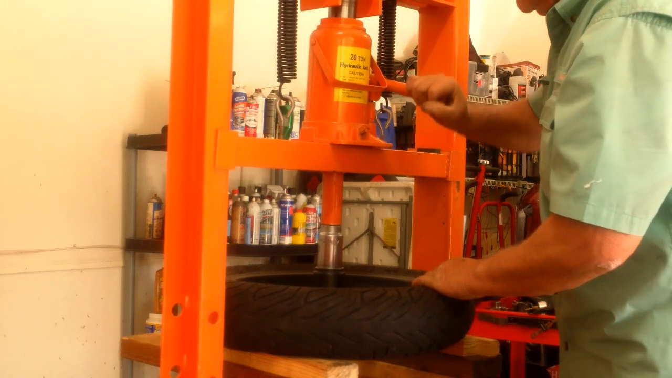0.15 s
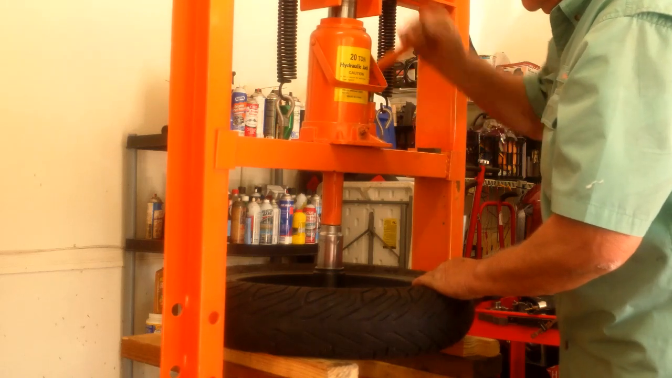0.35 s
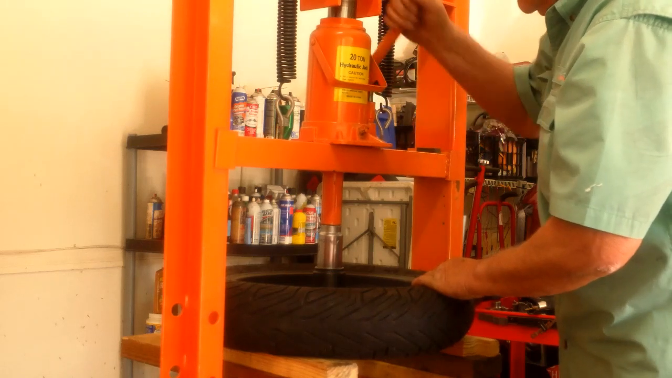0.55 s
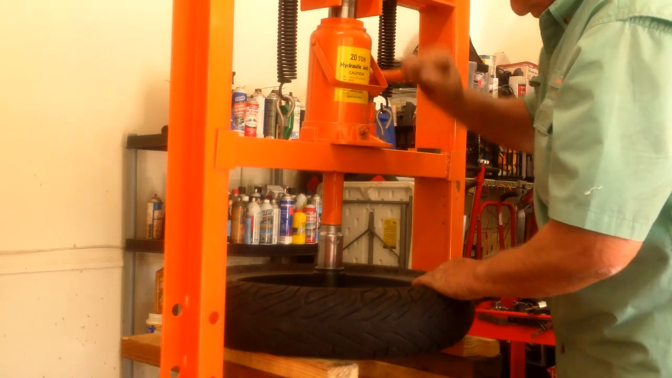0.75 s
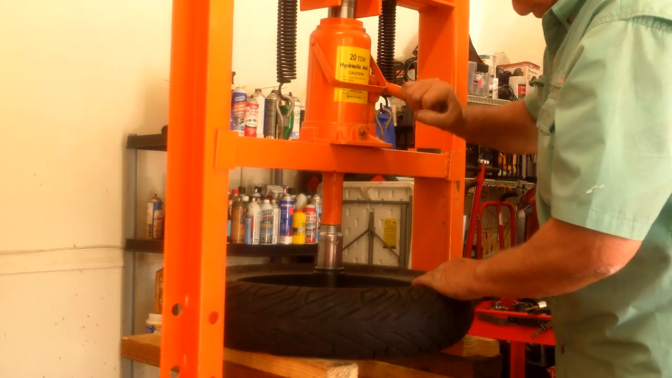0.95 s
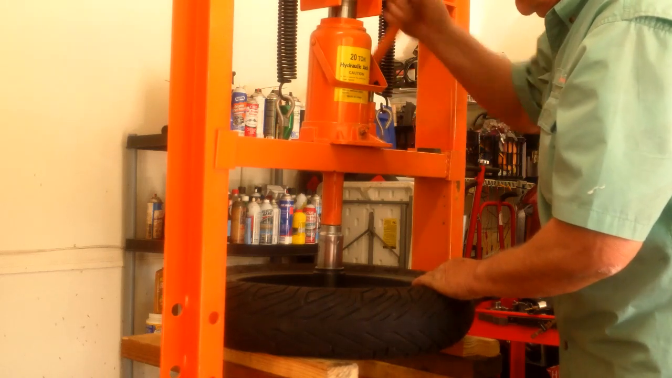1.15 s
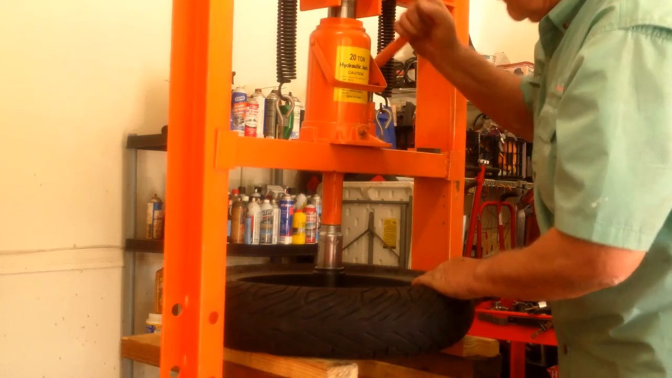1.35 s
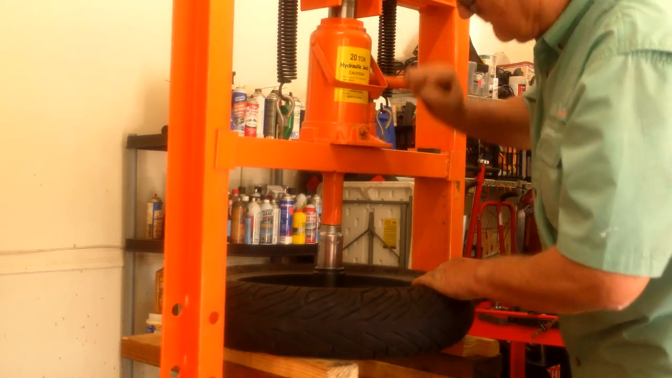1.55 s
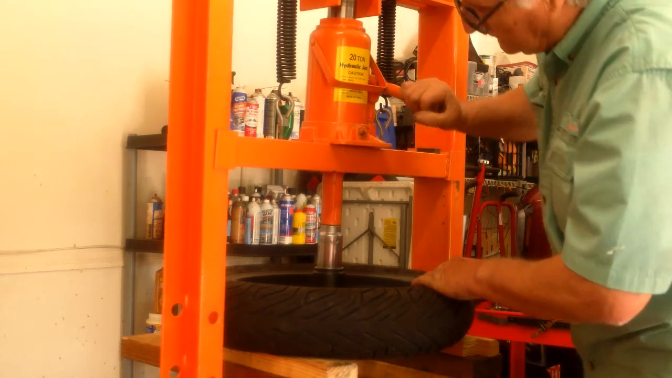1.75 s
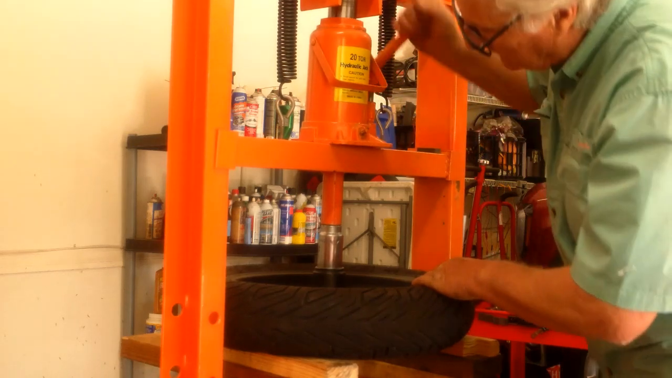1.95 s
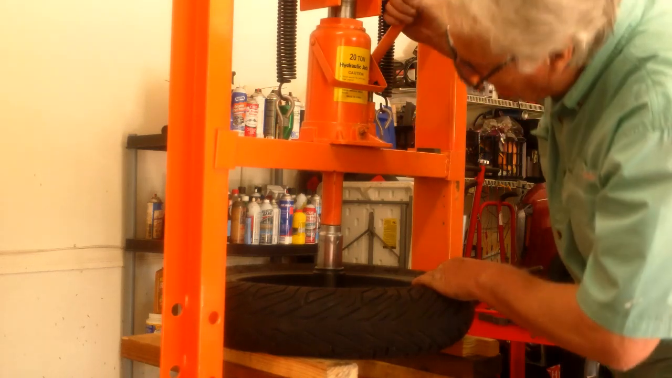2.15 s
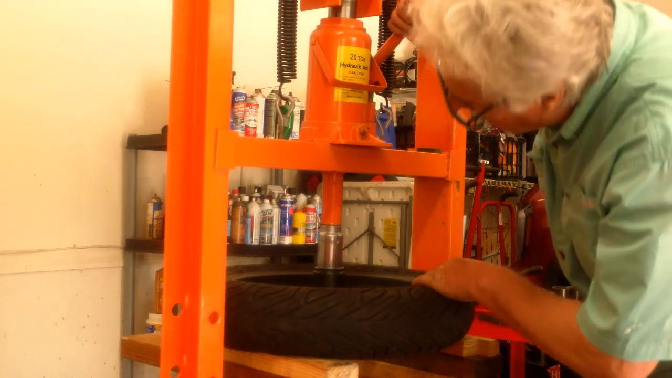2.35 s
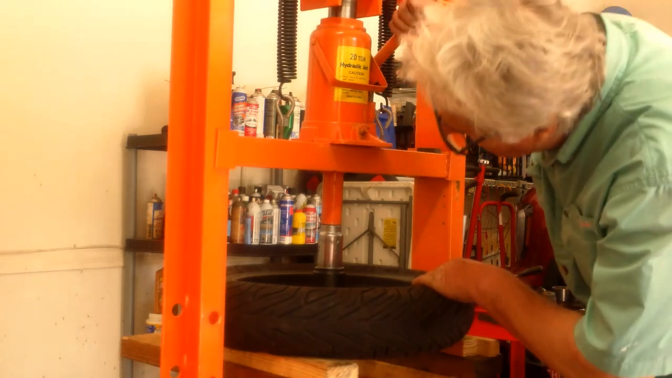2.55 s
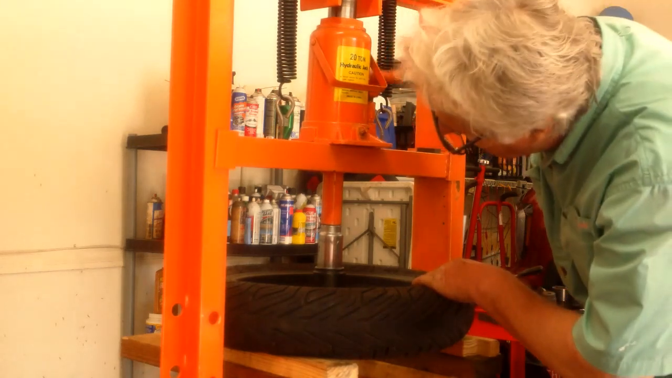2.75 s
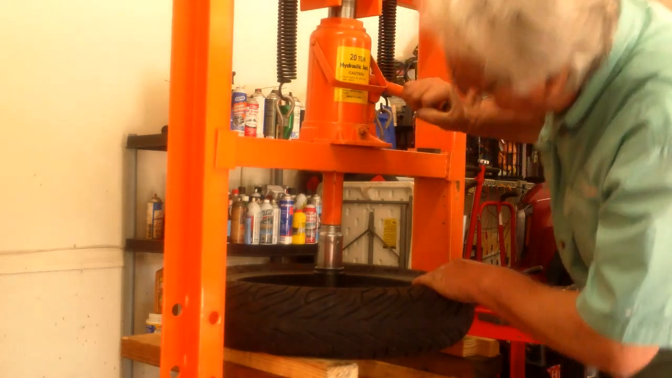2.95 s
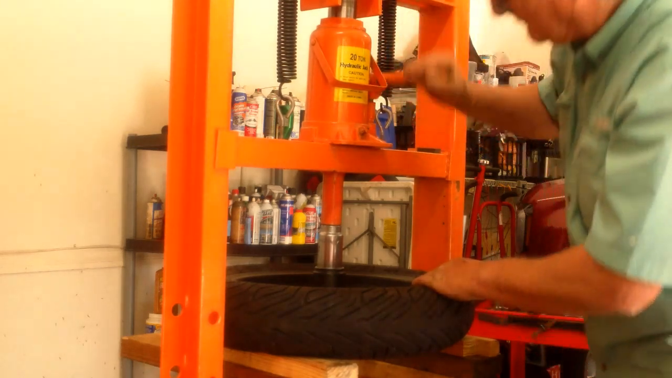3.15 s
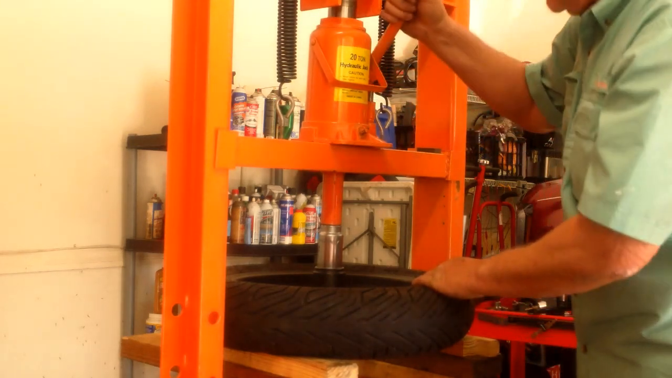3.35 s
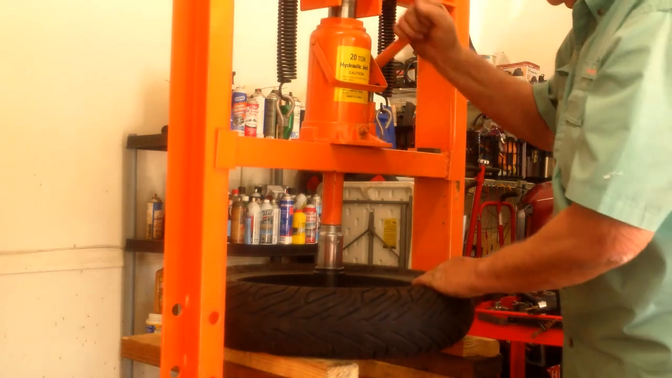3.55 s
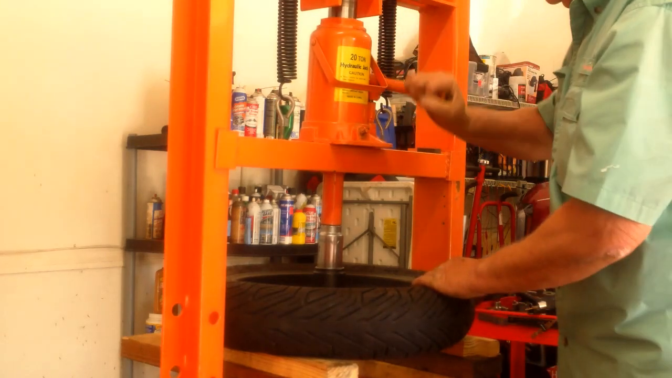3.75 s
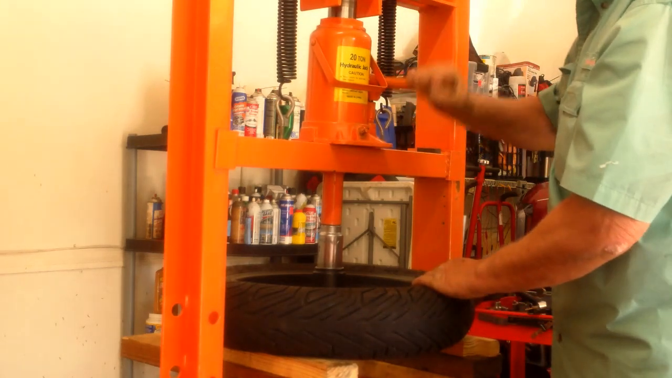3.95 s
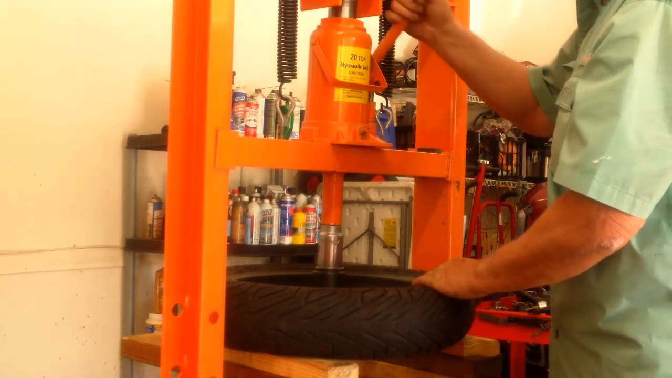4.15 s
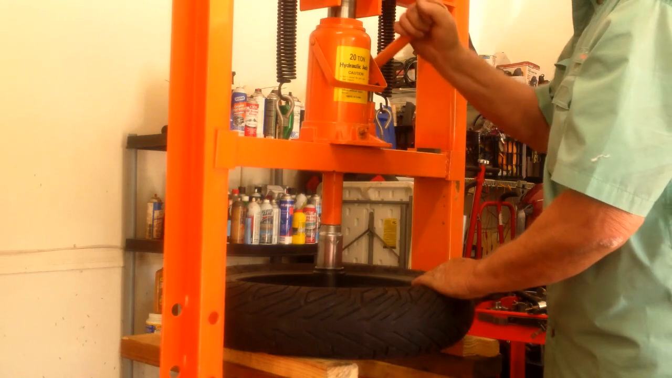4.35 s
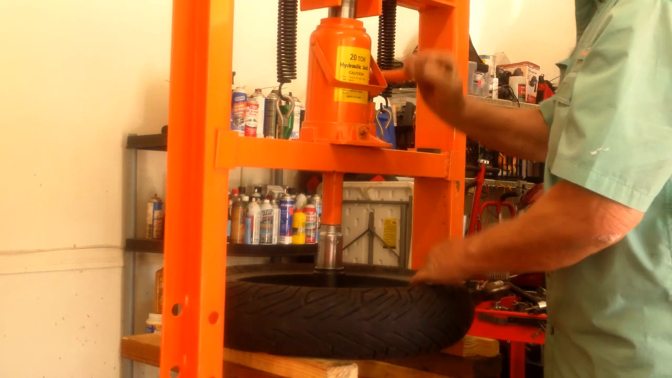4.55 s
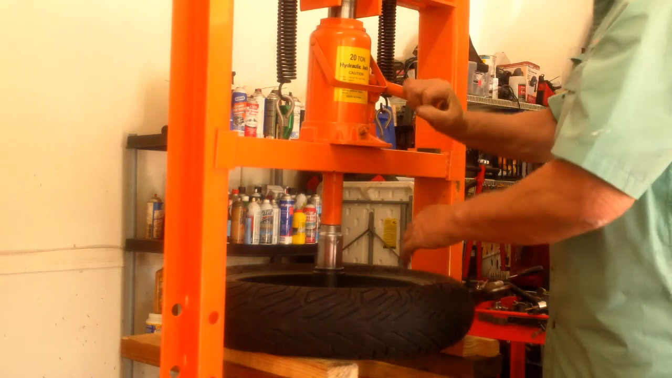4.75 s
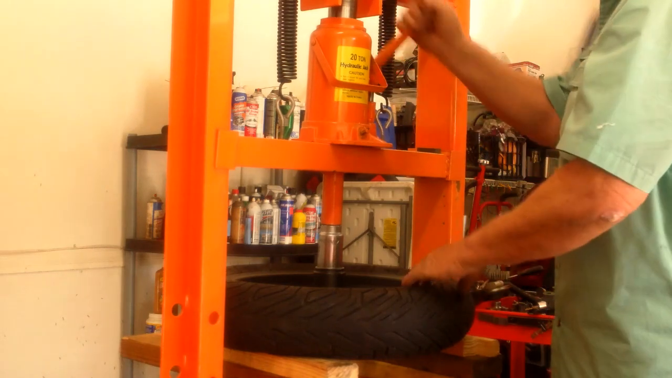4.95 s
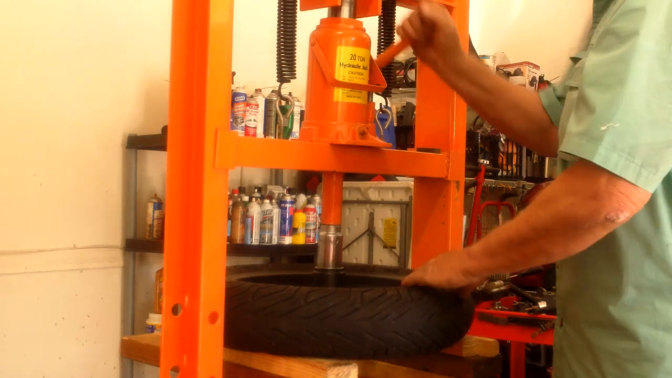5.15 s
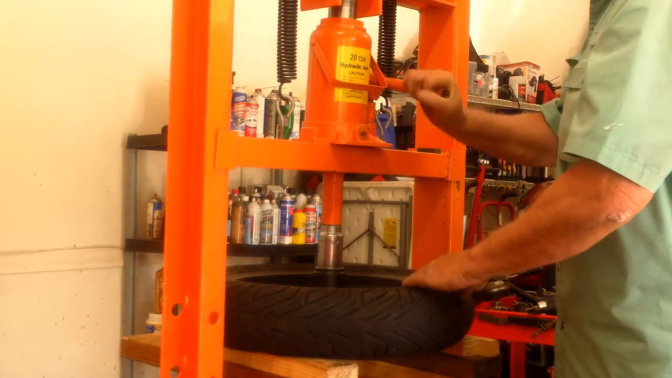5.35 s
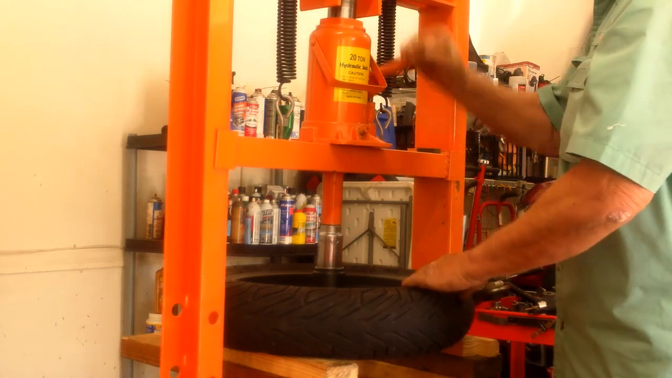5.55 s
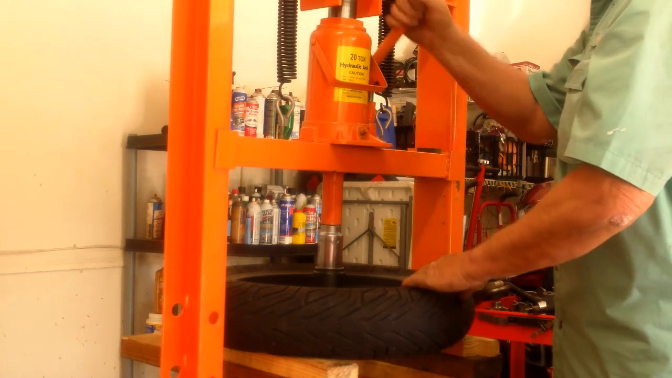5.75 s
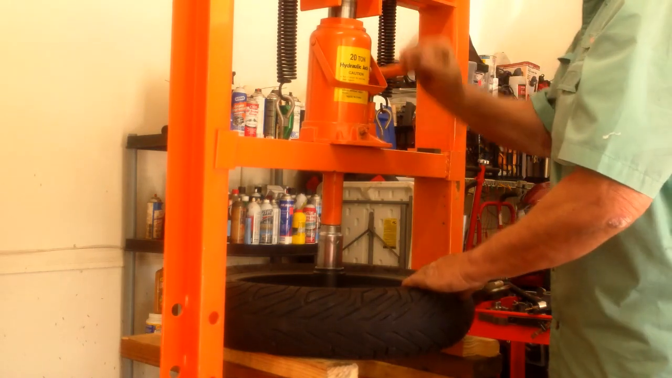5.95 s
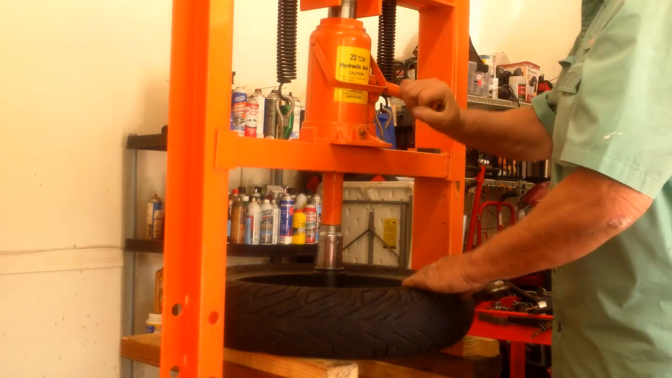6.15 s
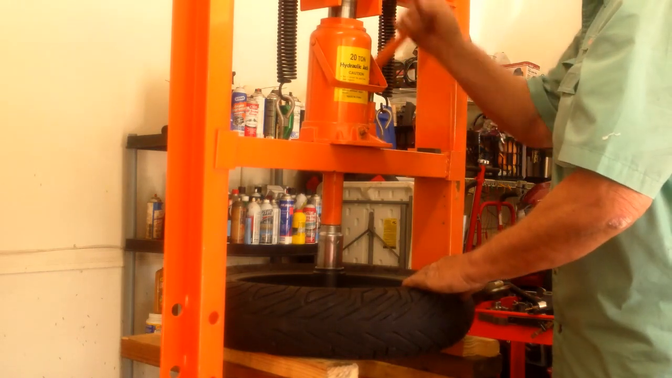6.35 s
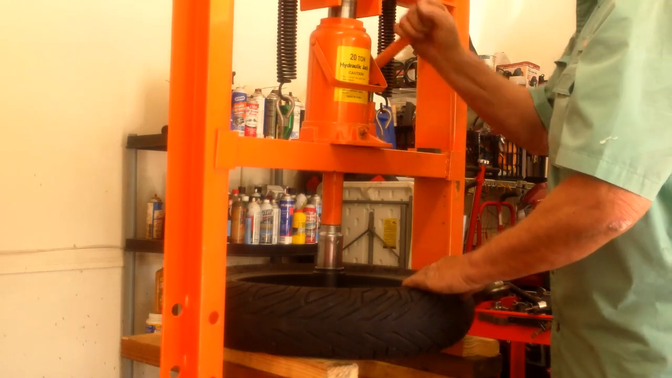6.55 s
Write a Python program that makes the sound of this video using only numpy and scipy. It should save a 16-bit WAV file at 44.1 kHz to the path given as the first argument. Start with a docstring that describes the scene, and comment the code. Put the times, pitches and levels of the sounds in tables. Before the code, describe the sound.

Quick metal rattles and clicks from a jack handle start lightly, become sparse in the middle, then return with sharp, louder clacks and closely packed ticks. Some hits carry a dull thud of the heavy steel frame and a brief ring. The place is a small hard-walled garage, quiet apart from soft hiss, faint hum and two short low rumbles late on; mono.

```python
"""A garage where a bottle jack on a steel shop press is pumped by hand: loose handle, pins and links
take up their play in chatters, bright ticks and dull clanks. Each contact is a noise crack with rebounds,
a bank of ringing steel modes and a lower, slower thud of the frame, carried on by noise tails for the hard
walls. Underneath lie a quiet shaped-noise hiss, a rumble with two short swells and a wavering two-tone hum."""
import sys
import numpy as np
from scipy import signal
from scipy.fft import rfft, irfft, next_fast_len
from scipy.io import wavfile
from scipy.ndimage import uniform_filter1d

SR = 44100
rng = np.random.default_rng(int(sys.argv[2]) if len(sys.argv) > 2 else 0)


def output_pcm(signal):
    """Save a mono or channel-first signal as 16-bit PCM at the path in sys.argv[1].

    Samples are clipped to [-1, 1] before scaling.
    """
    pcm = np.clip(np.atleast_2d(signal).T, -1, 1) * 32767
    wavfile.write(sys.argv[1], SR, np.round(pcm).astype(np.int16))


def nominal_scale(level):
    """Amplitude ratio for a level in decibels (scalar or array-like)."""
    x = np.asarray(level, float) / 20
    return 10 ** x


N = 290619
LENGTH = SR * 3 // 4  # samples in the sound of one contact

# Bare click. Each row: frequency in Hz, relative level in dB per Hz.
CRACK = [(180, -45), (300, -20), (1690, -8.5), (2790, 0.5), (4690, 5), (6240, 2.5), (7380, 4.5),
         (11800, -6), (15700, -12), (16500, -51)]
# Body of the press frame. Each row: frequency in Hz, relative level in dB per Hz.
THUD = [(90, -18), (180, -8), (400, -2), (900, -1), (1600, 0), (3000, -19.5), (6000, -75.5)]
# Lowest notes of the frame as the press takes load. Each row: time in seconds, boost in dB.
BOOM = [(0, 0), (2.5, 4), (3.5, -4.5), (6.6, -2.5)]
# Centres of the tone control, from frame up to small pins: frequencies in Hz.
COLOUR_HZ = [250, 1100, 2600, 5800, 11000]
# Balance of the bare click: frame, link and sparkle level in dB.
USUAL_DB = (-25.5, -18.5, -14)


def jack(crack_db=14, ring_db=-26, thud_db=-12, room_db=-0.5, gain_db=-4):
    """Contacts of jack and press: a short crack, ringing steel and a slower frame thud, direct and off the walls."""
    start_s, strike_db, frame_db, link_db, sparkle_db = contacts()
    count = len(start_s)
    t = np.arange(LENGTH) / SR
    m = next_fast_len(LENGTH)
    hz = np.fft.rfftfreq(m, 1 / SR)

    crack = nominal_scale(-60 * t / 0.015) * (1 - np.exp(-t / 0.00054)) * rng.standard_normal((count, LENGTH))
    crack = crack / np.linalg.norm(crack, axis=1, keepdims=True)
    click = nominal_scale(crack_db) * causal(along(CRACK, hz)) * rattle(count, m)

    thud = nominal_scale(thud_db - 60 * t / 0.19) * (1 - np.exp(-t / 0.013)) * rng.standard_normal((count, LENGTH))
    knock = rfft(thud, m) * causal(along(THUD, hz))

    ring = rfft(nominal_scale(ring_db) * ringing(count, t), m)

    # the spot that is struck tilts the colour between frame, links and small pins
    frame, link, sparkle = np.array([frame_db, link_db, sparkle_db]) - np.array(USUAL_DB)[:, None]
    lowest = frame + np.interp(start_s, *np.transpose(BOOM))
    tilt = np.array([lowest, frame, link, 0 * start_s, sparkle]).T
    colour = causal(np.array([along(list(zip(COLOUR_HZ, row)), hz) for row in tilt]))

    # the walls answer the click without its fine crack; the ringing reaches them more weakly
    walls = nominal_scale(room_db) * rfft(tails(count, t), m)
    mixed = click * (rfft(crack, m) + walls) + knock * (1 + walls) + ring * (1 + 0.64 * walls)
    heard = irfft(colour * mixed, m)[:, :LENGTH]

    # a second of margin on each side lets contacts overhang the ends
    out = np.zeros(N + 2 * SR)
    for start, db, sound in zip(np.round(start_s * SR).astype(int) + SR, strike_db, heard):
        out[start:start + LENGTH] += nominal_scale(db + gain_db) * sound
    return out[SR:SR + N]


# The linkage chatters as it takes up its play. Each row: first contact in seconds, last contact in seconds,
# first strike level in dB, last strike level in dB, sparkle in dB against the strike.
CHATTERS = [(0.3325, 0.3635, -22.5, -11, -15.5), (0.51, 0.5226, -27, -10, -7),
            (0.64, 0.6496, -24.5, -13.5, -3), (1.0854, 1.113, -26, -5.5, -13.5),
            (1.8993, 1.9242, -17, -13.5, -13.5), (3.2103, 3.2216, -15, -6.5, -12),
            (3.422, 3.4465, -23, -19.5, -10.5), (4.053, 4.0634, -12, -15.5, -14),
            (4.922, 4.931, -14.5, -4, -9.5), (5.5815, 5.6223, -27, -6.5, -10.5),
            (5.7627, 5.774, -18.5, -10.5, -3), (6.315, 6.3405, -14.5, -9, -12),
            (6.482, 6.4944, -14, -12.5, -7.5), (6.5658, 6.5792, -25, -3, -15)]
# Ticks of the pins with little frame in them, some alone, some closing a chatter. Each row: start in seconds,
# strike level in dB, link in dB and sparkle in dB, both against the strike.
TICKS = [(0.2513, -16.5, -24, -24.5), (1.2615, -11.5, -12.5, -6.5), (1.3872, -16.5, -9, -12),
         (1.8844, -31, -34, -25), (2.1236, -23, -14, -7), (2.3306, -24, -12.5, -24), (2.3486, -21, -25, -8),
         (3.2324, -15, -29, -17), (3.5508, -10, -17.5, -13), (4.0347, -20, -17.5, -21),
         (4.0761, -2.5, -21.5, -13), (4.2254, -26.5, -8, -10), (4.2472, -18, -22, -22),
         (4.3101, -20.5, -22, -8.5), (4.3345, -23.5, -15, -17), (4.371, -13.5, -13, -7),
         (4.9003, -23, -11.5, -14), (4.9374, -10, -32, -6.5), (5.0794, -26, -23, -10),
         (5.0983, -22, -23, -17), (5.1677, -31.5, -8, -7), (5.1986, -10.5, -17.5, -13.5),
         (5.8164, -12, -33, -15), (5.8561, -10.5, -17.5, -5), (6.2974, -33, -17, -9),
         (6.4413, -9, -26.5, -23), (6.5365, -14.5, -44, -14)]
# Dull clanks, faint to strong, with much of the frame in them. Each row: start in seconds, strike level in dB,
# frame in dB and link in dB, both against the strike.
CLANKS = [(-.06, -14, -18, -12.5), (0.363, -18.5, -14.5, -11.5), (0.6706, -17.5, -11.5, -7.5),
          (0.9546, -19.5, -9.5, -4), (1.2698, -15, -15, -27), (1.3395, -23.5, -18, -18),
          (1.4112, -18.5, -15.5, -15), (1.4276, -14.5, -13.5, -16.5), (1.7216, -13.5, -13.5, -5.5),
          (2.3956, -26, -15.5, -4), (3.0689, -34, -14.5, -15.5), (3.5832, -10, -19, -11),
          (3.5882, -9, -15, -12), (3.9568, -29, -14.5, -15.5), (4.3991, -15.5, -17, -11),
          (4.7445, -23.5, -8, -6), (4.784, -24.5, -17.5, -9), (5.224, -15.5, -12.5, -11),
          (5.5232, -32, -13, -11), (5.885, -8.5, -15.5, -12.5), (6.177, -19, -10.5, -5),
          (6.227, -29, -12, -12)]


def contacts(gap_s=0.0105, chatter_link_db=-20, clank_sparkle_db=-14.5):
    """Start, strike, frame, link and sparkle of every contact; a chatter steps evenly from first to last."""
    pins = list(TICKS)
    for first, last, first_db, last_db, sparkle_db in CHATTERS:
        steps = round((last - first) / gap_s) + 1
        for share in np.linspace(0, 1, steps):
            s = first + share * (last - first)
            db = first_db + share * (last_db - first_db)
            pins.append((s, db, chatter_link_db, sparkle_db))

    rows = []
    for s, db, link_db, sparkle_db in pins:
        # ticks and chatters hold little frame, and its share shrinks as the strike grows
        frame_db = -26.5 - 0.57 * (db + 15)
        rows.append((s, db, frame_db, link_db, sparkle_db))
    for row in CLANKS:
        rows.append((*row, clank_sparkle_db))
    return np.transpose(rows)


def rattle(count, m, level_db=-7, span_s=0.022):
    """Spectrum of one contact followed by five weaker rebounds at uneven gaps."""
    when, size = rng.random((2, count, 5))
    place = (SR * (0.001 + span_s * when)).astype(int)
    train = np.zeros((count, m))
    train[:, 0] = 1
    # rebounds tend to weaken with time
    train[np.arange(count)[:, None], place] = nominal_scale(level_db - 6.3 * when - 5.8 * size)
    return rfft(train)


# Ringing of jack and frame. Each row: frequency in Hz, relative level in dB, time to fall 60 dB in seconds.
STEEL = [(372, -27, 0.63), (675, -8, 0.21), (761.6, -16.5, 0.67), (1047, -15.5, 0.69), (1080, -8.5, 0.33),
         (1124, -13, 0.5), (1230, -14.5, 0.22), (1335, -7, 0.25), (1597, -14, 0.5), (1754, -11, 0.24),
         (1950, -22, 0.64), (2147, -4, 0.14), (2940, -18, 0.22), (3080, -9.5, 0.53), (3400, -4, 0.2),
         (3600, -10.5, 0.56), (4290, -15, 0.11), (4700, -15, 0.34), (4765, -1.5, 0.18), (5093, -5, 0.14),
         (5500, -6, 0.28), (5880, -8, 0.1), (6650, 8, 0.056), (6890, -3.5, 0.35), (7380, -7, 0.22),
         (7560, -17, 0.17), (8500, -7, 0.29), (8777, 7.5, 0.079), (8400, -8.5, 0.23), (9370, -1, 0.22),
         (10400, -4.5, 0.21), (12200, -26, .2)]


def ringing(count, t, spread_db=4.5, blur=0.0099):
    """Steel modes at new strengths for each spot struck; loose joints widen them by a share of their pitch."""
    hz, db, t60 = np.transpose(STEEL)[:, :, None]
    bank = nominal_scale(db - 60 * t / t60) * (1 - np.exp(-t * hz / 3))
    out = np.zeros((count, len(t)))
    # contacts within each of eight groups share the same random drifts of phase
    for group in np.array_split(np.arange(count), 8):
        knots = np.cumsum(rng.standard_normal((len(STEEL), 128)), axis=1)
        drift = np.array([np.interp(t / t[-1], np.linspace(0, 1, len(k)), k) for k in knots])
        depth = np.sqrt(2 * np.pi * blur * hz * t[-1] / knots.shape[1])
        waves = bank * np.sin(2 * np.pi * hz * t + depth * drift)
        strength = nominal_scale(spread_db * rng.standard_normal((len(group), len(STEEL))))
        out[group] = strength @ waves
    return out


# Hard walls. Each row: frequency in Hz, time to fall 60 dB in seconds, relative level in dB.
GARAGE = [(300, 0.53, -3.5), (780, 0.8, -1), (2110, 0.54, 5.5), (5800, 0.48, 2), (14800, 0.28, 3.5)]


def tails(count, t, patchy_db=4.5):
    """A new wall answer of energy 1 for every contact: noise with each frequency dying at its own speed."""
    hz, s, z = signal.stft(rng.standard_normal((count, len(t))), SR, nperseg=256)
    uneven = uniform_filter1d(rng.standard_normal((count, len(hz))), size=4, axis=1)
    wall_hz, wall_t60, wall_db = np.transpose(GARAGE)
    t60 = along(list(zip(wall_hz, wall_t60)), hz)[:, None]
    db = along(list(zip(wall_hz, wall_db)), hz)[:, None]
    z = z * nominal_scale(patchy_db * unit(uneven)[:, :, None] + db - 60 * s / t60)
    tail = signal.istft(z, SR, nperseg=256)[1][:, :len(t)] * (1 - np.exp(-t / 0.0011))
    tail = tail * (1 + 0.47 * np.exp(-t / 0.015))  # the nearest surfaces answer first and strongest
    return tail / np.linalg.norm(tail, axis=1, keepdims=True)


# Hiss of room air and microphone. Each row: frequency in Hz, relative level in dB per Hz.
HISS = [(12, -4), (20, -5.5), (53, -6.5), (114, -8), (200, -12.5), (244, -11.5), (273, -12.5), (404, -16),
        (566, -12), (839, -17), (994, -18.5), (3720, -26), (8650, -25), (15200, -31.5), (16500, -45)]
# Low rumble with two short swells. Each row: time in seconds, level in dB rms.
RUMBLE = [(0, -60.5), (5.3, -71), (5.42, -44), (5.6, -52), (5.75, -59), (6.0, -68), (6.12, -50.5),
          (6.251, -74)]


def garage_air(hiss_db=-53.5):
    """Even hiss of shaped noise over a low noise rumble of changing level, with the hum."""
    s, db = np.transpose(RUMBLE)
    level = nominal_scale(np.interp(np.arange(N) / SR, s, db))
    rumble = level * coloured([(4, -28), (14, 6), (40, -8), (80, -34), (200, -120)])
    return nominal_scale(hiss_db) * coloured(HISS) + rumble + hum()


# Hum. Each row: frequency in Hz, level in dB rms.
HUM = [(99, -71), (121, -68)]


def hum(waver_hz=5):
    """Two low tones whose phase wanders at random, which widens each of them."""
    walk = np.cumsum(rng.standard_normal((len(HUM), N)), axis=1) * np.sqrt(2 * np.pi * waver_hz / SR)
    t = np.arange(N) / SR
    out = np.zeros(N)
    for (hz, db), wander in zip(HUM, walk):
        out += nominal_scale(db) * np.sqrt(2) * np.sin(2 * np.pi * hz * t + wander)
    return out


def coloured(spectrum):
    """Steady noise of rms 1, shaped by (Hz, dB) points."""
    m = next_fast_len(N + SR // 4)
    shape = nominal_scale(along(spectrum, np.fft.rfftfreq(m, 1 / SR)))
    return unit(irfft(rfft(rng.standard_normal(m)) * shape, m)[:N])


def causal(gain_db):
    """Minimum-phase response for rows of dB gains, so that no colour rings before its blow."""
    cep = irfft(gain_db * np.log(10) / 20)
    half = cep.shape[-1] // 2
    cep[..., 1:half] *= 2
    cep[..., half + 1:] = 0
    return np.exp(rfft(cep))


def along(points, hz):
    """Reads a curve of (Hz, value) points on a log frequency axis."""
    f, v = np.transpose(points)
    return np.interp(np.log(hz + 1), np.log(f + 1), v)


def unit(x):
    """Scales to rms 1."""
    return x / np.sqrt(np.mean(x ** 2) + 1e-20)


def scene():
    """Jack over the garage air, in mono."""
    return (jack() + garage_air())[None]


def top_cut(x):
    """Nothing passes above the cut-off."""
    return signal.sosfilt(signal.butter(12, 17120, fs=SR, output="sos"), x)


def record(dry):
    """Hands on the finished mix."""
    return top_cut(dry)


dry = scene()
out = record(dry)
output_pcm(out)
```